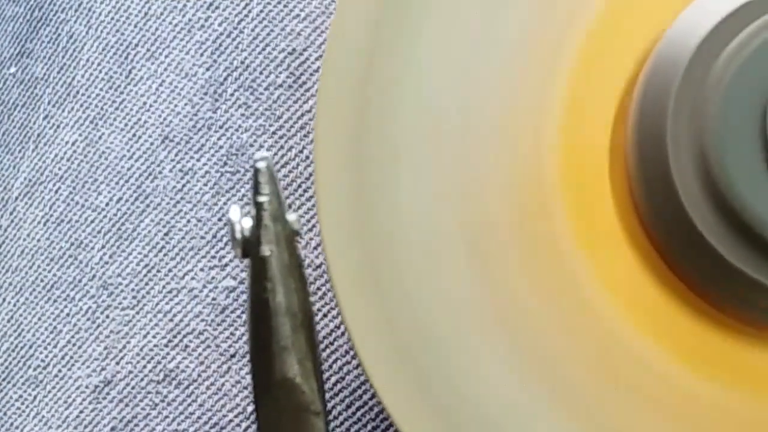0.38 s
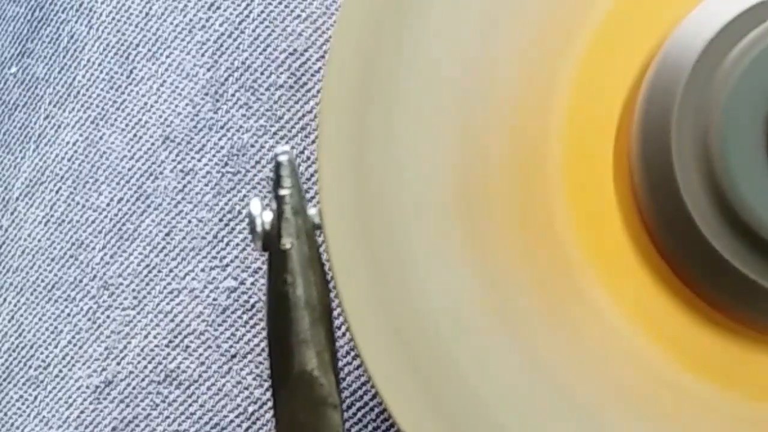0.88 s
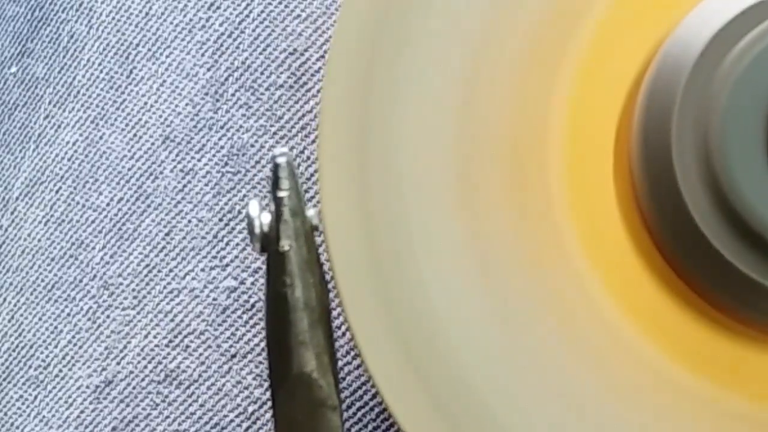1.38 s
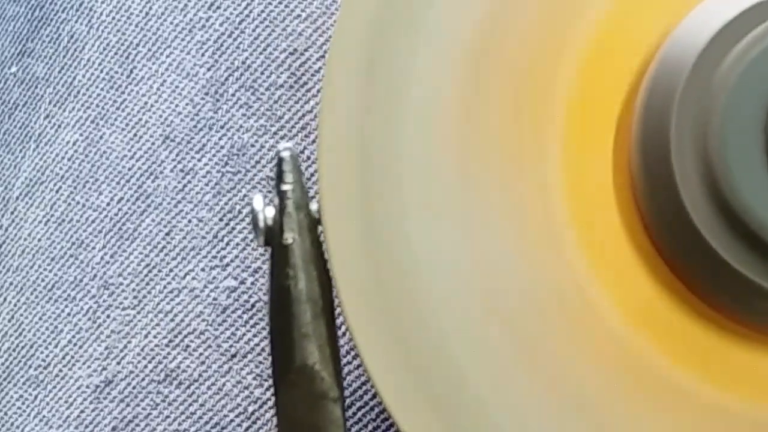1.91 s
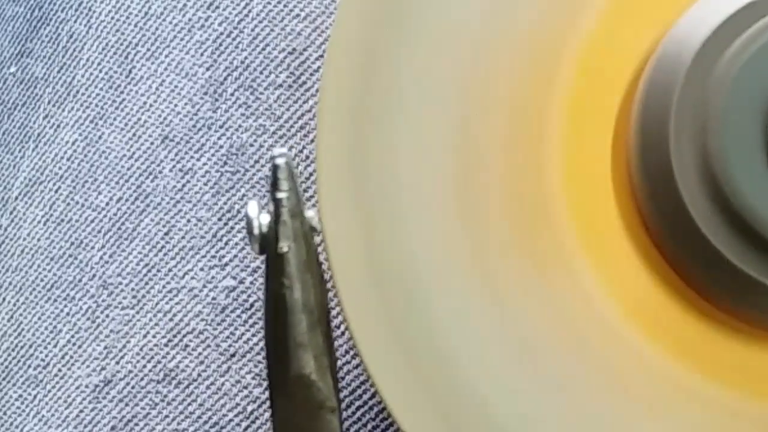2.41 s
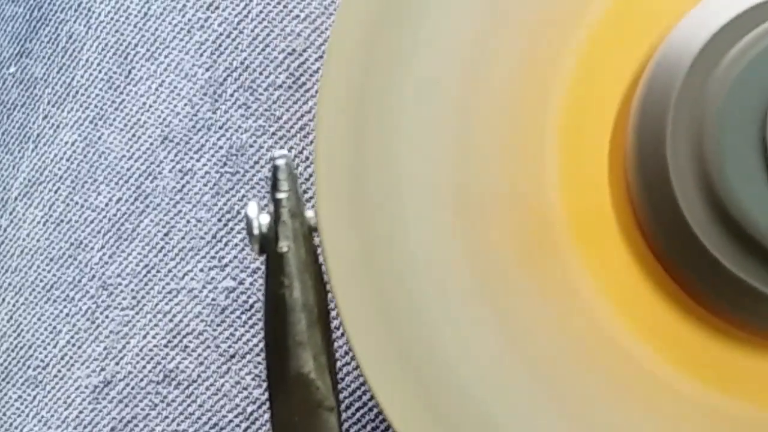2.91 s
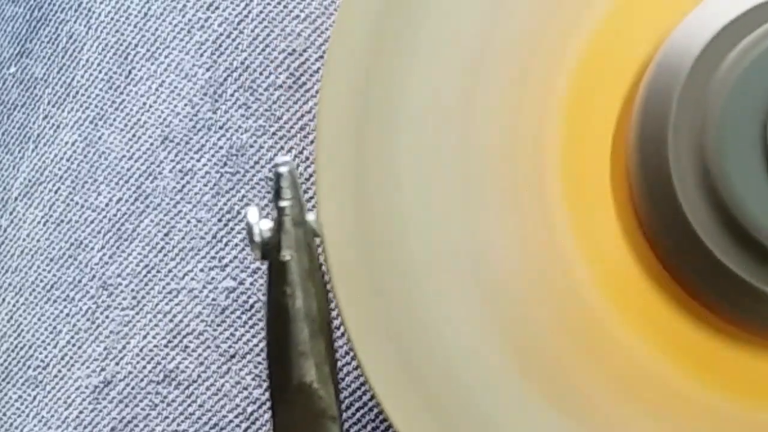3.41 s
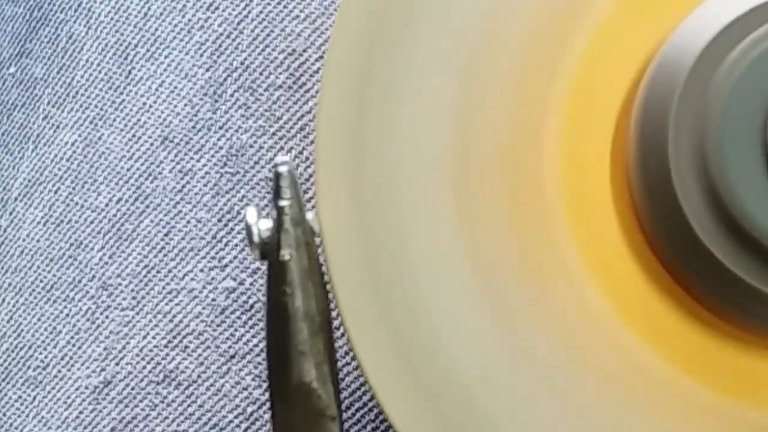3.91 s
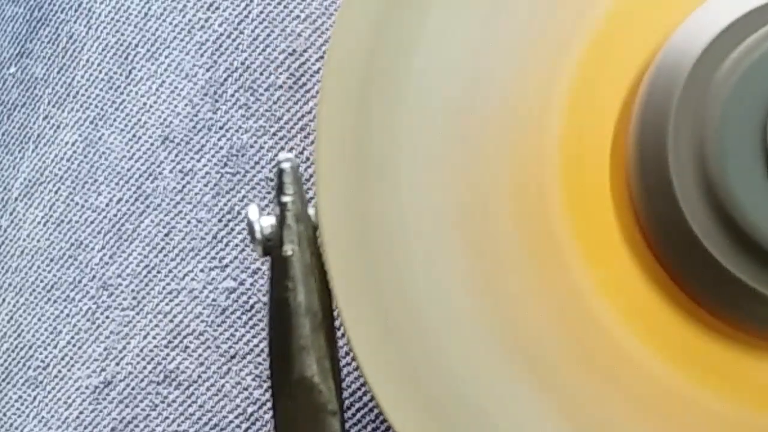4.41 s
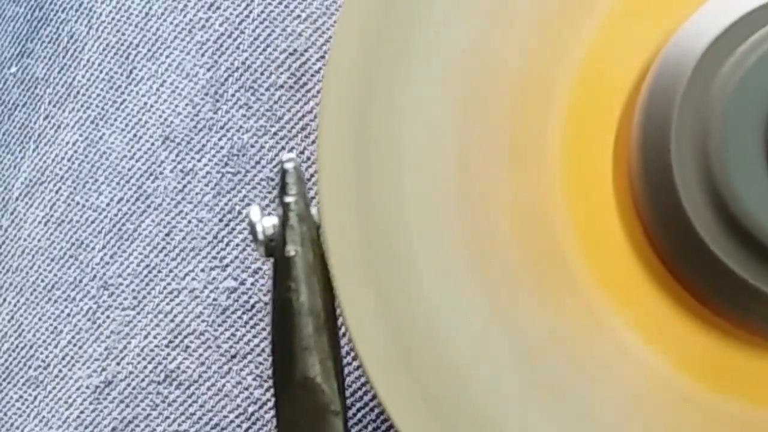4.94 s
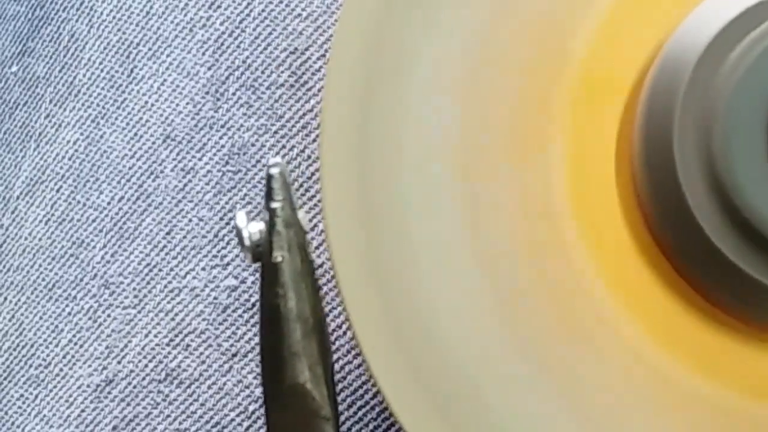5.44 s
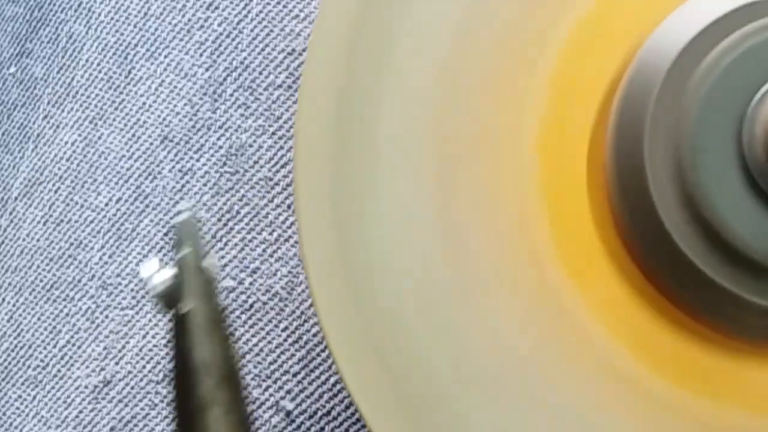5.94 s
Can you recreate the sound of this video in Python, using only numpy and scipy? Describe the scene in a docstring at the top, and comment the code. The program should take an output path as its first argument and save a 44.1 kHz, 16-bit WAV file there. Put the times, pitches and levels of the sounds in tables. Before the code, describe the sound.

Heard close up in a small workshop, a bench grinder coasts with a rough housing rumble, airy whir and small dull ticks from a loose part. At 0.5 s power surges, the whir jumps louder and the loose part buzzes and rattles. From about 0.95 to 1.4 s a steel screw gripped in pliers meets the rim: rapid, irregular metallic bites, ringing briefly, with fine gritty sizzle. From 1.4 to 2.15 s mostly whir and loose ticks remain. Chatter returns at 2.17 s, and a second surge comes just after 2.5 s. Dense bright bites and scraping continue, their repetition slowing as the wheel loses speed, with a short gap around 4.25-4.5 s and sparser, weaker contacts afterward. A final gritty, sharper scrape comes around 5.1 s. After 5.2 s the wheel coasts quieter and slower, with a few faint ticks until 6 s. Short room reflections follow the hits.

```python
"""A bench grinder coasts in a workshop, its housing rumbling while a loose part ticks on the wheel guard.
At 0.5 s a burst of power spins the wheel up; from 0.95 s a small steel screw, held in pliers, is pressed on.
High spots of the rim bite once a turn, each ringing pliers and screw; fine grit scrapes between the bites.
A second burst comes at 2.5 s, with bites until 5.2 s; then the wheel coasts on, slower and quieter.
Noise is shaped by spectra and resonances; bites and ticks are short pushes that ring resonant bodies."""
import sys
import numpy as np
from scipy import signal
from scipy.fft import rfft, irfft, next_fast_len
from scipy.io import wavfile
from scipy.ndimage import uniform_filter1d, minimum_filter1d, map_coordinates

SR = 44100
rng = np.random.default_rng(int(sys.argv[2]) if len(sys.argv) > 2 else 0)


def unload_audio(sound):
    """Save the sound as a 16-bit wav file, at the path given as the first command line argument."""
    columns = np.transpose(np.atleast_2d(sound))
    # keep every value between -1 and 1, then stretch to whole-number steps
    steps = np.round(np.clip(columns, -1, 1) * 32767)
    wavfile.write(sys.argv[1], SR, steps.astype(np.int16))


def makeup_ratio(level_db):
    """Linear amplitude ratio for a level in decibels (20 dB per factor of ten)."""
    decades = np.asarray(level_db, float) / 20
    return 10 ** decades


N = 267687

# Wheel speed: two bursts of power, coasting after each. Each row: time in seconds, turn period in ms.
TURN_MS = [(0, 24), (.49, 26.5), (.52, 11.5), (.95, 14), (1.4, 16.6), (2.15, 18.6), (2.53, 22.2),
           (2.56, 11.7), (3.2, 13.3), (3.6, 14.9), (4.2, 17.2), (4.55, 18.8), (5.2, 22.6), (6.07, 28)]
# Shaking of the machine and rush of the wheel through the air.
# Each row: time in seconds, growl level in dB at the usual speed, rush level in dB.
SHAKE_DB = [(0, -52, -44.5), (.49, -54, -47), (.52, -45.5, -38), (.7, -44.5, -41.5), (.93, -44, -41.5),
            (1.2, -48.5, -46), (1.55, -46.5, -40.5), (2.12, -48.5, -41.5), (2.2, -52.5, -47),
            (2.5, -52, -44.5), (2.56, -52, -43.5), (2.66, -46, -43.5), (2.8, -46.5, -45.5),
            (2.97, -46.5, -44.5), (3.3, -50.5, -47.5), (3.9, -53, -49), (4.35, -55, -48.5),
            (4.75, -55.5, -50.5), (4.97, -53.5, -46.5), (5.5, -56, -50), (6.07, -58, -49.5)]
# Spectrum of the grains. Each row: frequency in Hz, relative level in dB.
SIZZLE_SPECTRUM = [(4000, -30), (6000, -5), (9000, 6.5), (12000, -1), (14500, -8.5), (15700, -11)]
# Resonances of the pliers. Each row: frequency in Hz, width in Hz, relative level in dB.
PLIERS_MODES = [(2340, 190, -12), (2873, 400, -3), (3132, 236, 8.5), (3372, 369, 3), (3928, 227, -3),
                (4778, 94, -8)]
# Resonances of the screw. Each row: frequency in Hz, width in Hz, relative level in dB.
SCREW_MODES = [(7100, 300, 2), (8630, 280, 5), (9370, 300, 13), (10500, 460, -5), (11900, 320, -9),
               (13600, 640, -3), (15000, 900, -11)]


def unit(x):
    """Scales to rms 1."""
    return x / np.sqrt(np.mean(x ** 2) + 1e-20)


def along(points, hz):
    """Interpolates (Hz, value) points on a log frequency axis."""
    f, v = np.transpose(points)
    return np.interp(np.log(hz + 1), np.log(f + 1), v)


def curves(rows):
    """One value per sample for each column after the time."""
    s, *cols = np.transpose(rows)
    return [np.interp(np.arange(N) / SR, s, c) for c in cols]


def wobble(knots_per_s):
    """A smooth random curve."""
    knots = rng.standard_normal(int(N * knots_per_s / SR) + 4)
    return map_coordinates(knots, [np.arange(N) * knots_per_s / SR])


def filtered(x, response):
    """Multiplies the spectrum of x by a response of frequency in Hz."""
    m = next_fast_len(N + SR // 2)
    return irfft(rfft(x, m) * response(np.fft.rfftfreq(m, 1 / SR)), m)[..., :N]


def modes(table):
    """Causal response of a set of resonances, with alternating signs."""
    def response(f):
        total = 0
        for k, (hz, width_hz, db) in enumerate(table):
            damping = 1j * f * width_hz
            total = total + (-1) ** k * makeup_ratio(db) * damping / (hz * hz - f * f + damping)
        return total
    return response


def grit(spread_db, knots_per_s):
    """Noise of rms 1 whose strength wanders from grain to grain."""
    return unit(rng.standard_normal(N) * makeup_ratio(spread_db * wobble(knots_per_s)))


def housing():
    """Bearings and wheel shake the housing: uneven noise lifted at panel resonances, over a motor hum."""
    # Housing panel resonances. Each row: frequency in Hz, width in Hz.
    panel_modes = [(552, 59), (629, 12), (806, 19), (980, 51), (1170, 84), (1430, 95), (1535, 17),
                   (1667, 57), (2110, 27), (2268, 34), (2480, 18), (3880, 24), (5100, 280), (6150, 340),
                   (7300, 410), (8370, 60), (8700, 70)]
    # Noise spectra. Each row: frequency in Hz, relative level in dB.
    growl_spectrum = [(15, -77), (25, -52), (57, -35), (128, -20), (173, -15.5), (214, -16.5), (376, -7),
                      (429, -5.5), (559, -8), (753, -11.5), (981, -2.5), (1300, -7), (1690, -33),
                      (2860, -120)]
    rush_spectrum = [(740, -22.5), (1250, -6.5), (1480, -3), (1650, -5.5), (2070, 0), (2550, -1),
                     (2850, -14), (3260, 1), (4170, -11), (4500, -14.5), (5850, -24), (9900, -120)]
    hiss_spectrum = [(2350, -33.5), (4000, -2.5), (4580, -5), (5200, -5.5), (6630, -12), (7220, -12),
                     (9020, -16.5), (10600, -29.5), (15600, -44)]
    usual_turn_ms, usual_growl_db = 12.2, -49
    hum_hz, hum_db = 61.6, -84

    growl_db, rush_db = curves(SHAKE_DB)
    hiss_db = -53 + 0.89 * (growl_db - usual_growl_db)
    speed_db = 20 * np.log10(usual_turn_ms / curves(TURN_MS)[0])
    growl_db = growl_db + 0.38 * speed_db
    hiss_db = hiss_db + 0.63 * speed_db

    def panels(f):
        return 1 + 0.67 * sum(1 / (1 + (2 * (f - hz) / width_hz) ** 2) for hz, width_hz in panel_modes)

    def shaken(spectrum, push):
        return unit(filtered(push, lambda f: makeup_ratio(along(spectrum, f)) * panels(f)))

    growl = makeup_ratio(growl_db) * shaken(growl_spectrum, grit(0.89, 120))
    rush = makeup_ratio(rush_db) * shaken(rush_spectrum, grit(1.9, 200))
    hiss = makeup_ratio(hiss_db) * shaken(hiss_spectrum, grit(1.3, 200))
    # a narrow noise band, so the hum wavers
    hum = unit(filtered(rng.standard_normal(N), lambda f: 1 / (1 + ((f - hum_hz) / 7) ** 4)))
    top_hiss = unit(filtered(rng.standard_normal(N), lambda f: 1 / (1 + ((f - 15300) / 450) ** 2)))
    return growl + rush + hiss + makeup_ratio(hum_db) * hum + makeup_ratio(hiss_db - 26.0) * top_hiss


def scrape():
    """Between strong bites the screw skips lightly on the rim, and grains of the wheel sizzle across it."""
    # How hard the screw is pressed on. Each row: time in seconds, press in dB (sizzle rms 6 dB above it).
    press = [(0.0, -86), (0.47, -97), (0.57, -69.5), (0.94, -73), (0.98, -62), (1.5, -73), (2.08, -77),
             (2.25, -63.5), (2.32, -68), (2.65, -70), (2.79, -63), (2.96, -78), (3.13, -60.5), (3.36, -68),
             (3.52, -67.5), (3.62, -65), (3.63, -69), (4.07, -63.5), (4.46, -86.5), (4.51, -70.5),
             (4.68, -63), (4.78, -71), (4.92, -70), (4.99, -89), (5.0, -74), (5.14, -56.5), (5.22, -64.5),
             (5.29, -90), (6.04, -100), (6.07, -88)]
    firm_press_db, firm_ring_db, ring_db_per_db = -66, -43, 1.2
    skips_per_turn = 2  # nominal

    press_db, = curves(press)
    ring_db = firm_ring_db + ring_db_per_db * (press_db - firm_press_db)
    skips_per_ms = skips_per_turn / curves(TURN_MS)[0] * makeup_ratio(.4 * wobble(9))
    skip_count = np.cumsum(skips_per_ms) * (1000 / SR)
    skips = unit((0.1 + np.exp(-3.5 * (skip_count % 1))) * makeup_ratio(2.8 * wobble(90)))
    ring = unit(filtered(skips * rng.standard_normal(N), modes(PLIERS_MODES)))

    def grains(f):
        return makeup_ratio(along(SIZZLE_SPECTRUM, f)) + 0.45 * abs(modes(SCREW_MODES)(f))

    sizzle = unit(filtered(skips * grit(1.1, 700), grains))
    return makeup_ratio(ring_db) * ring + makeup_ratio(press_db + 6.0) * sizzle


def blows(s, db, contact_s, body, drag):
    """A sharp touch, then grains dragging during contact; each blow rings the body to its peak level."""
    t = np.arange(1024) / SR
    touching = t < np.reshape(contact_s, (-1, 1))
    push = drag * rng.standard_normal((len(s), len(t))) * touching * np.clip(t / 0.0011, 0, 1)
    push[:, 0] += 1
    ring = irfft(rfft(push) * body(np.fft.rfftfreq(len(t), 1 / SR)), len(t))
    ring *= (makeup_ratio(db) / abs(ring).max(axis=1))[:, None]
    where = np.round(s * SR).astype(int)[:, None] + np.arange(len(t))
    return np.bincount(where.ravel(), ring.ravel(), N + SR)[:N]


def rattle():
    """Something loose ticks against the wheel guard; the contact is soft, so the top is dull."""
    # Loudest ticks. Each row: time in seconds, level in dB (peak 0.6 dB above it).
    loud_ticks = [(.0605, -34), (0.1148, -33), (0.1938, -31.5), (.2067, -35), (.38, -35), (.4117, -34),
                  (0.4276, -36), (.4559, -37), (.489, -35), (0.504, -30), (0.511, -27), (0.565, -25),
                  (0.5803, -24), (.5969, -27), (0.614, -26), (0.6547, -26), (.6896, -33), (.8443, -34),
                  (.8799, -28), (1.4176, -30), (1.664, -25.5), (1.691, -30), (1.7285, -25.5),
                  (1.8254, -27.5), (1.854, -28), (1.8945, -33), (1.9556, -28.5), (4.335, -36),
                  (4.3644, -34), (4.3853, -33), (4.483, -33), (5.2955, -38), (5.3918, -38), (5.4675, -36),
                  (5.5037, -39), (5.5705, -29.5), (5.599, -38), (5.6596, -33), (5.9393, -38)]
    # Ring of the loose part. Each row: frequency in Hz, width in Hz, relative level in dB.
    guard_modes = [(2180, 810, -12), (3220, 150, -2.5), (3280, 340, 10), (4140, 660, -13), (6500, 470, -17),
                   (7600, 520, -8.5)]
    # The motor pulls and the loose part buzzes. Each row: start in seconds, length in seconds, mean level in dB.
    pulls = [(0.502, .17, -32.5), (2.535, 0.09, -33)]
    faint_count, faint_over_growl_db, faint_spread_db = 130, 14, 2
    buzz_per_s = 170

    faint_s = rng.random(faint_count) * (N - 1) / SR
    growl_db = np.interp(faint_s, *np.transpose(SHAKE_DB)[:2])
    faint_db = growl_db + faint_over_growl_db + faint_spread_db * rng.standard_normal(faint_count)
    buzz = [(t, db) for s, length, db in pulls for t in np.arange(s, s + length, 1 / buzz_per_s)]
    buzz = np.transpose(buzz)
    # scatter: 1.5 ms in time, 3 dB in level
    buzz = buzz + [[.0015], [3]] * rng.standard_normal((buzz.shape[1], 2)).T
    s, db = np.hstack([np.transpose(loud_ticks), [faint_s, faint_db], buzz])

    def dull(f):
        return modes(guard_modes)(f) / (1 + 1j * f / 8000) ** 4

    return blows(s, db + .6, .0018, dull, drag=.2)


def shop(x):
    """The walls answer with a diffuse tail; each frequency dies at its own speed."""
    # Decay of the room. Each row: frequency in Hz, t60 in seconds.
    decay = [(300, 0.16), (3000, 0.28), (12000, 0.29)]
    hz, t, z = signal.stft(rng.standard_normal(SR // 3), SR, nperseg=256)
    fade = makeup_ratio(-60 * t / along(decay, hz)[:, None])
    tail = signal.istft(z * fade, SR, nperseg=256)[1]
    delayed = np.pad(x, (200, 0))  # samples
    return signal.fftconvolve(delayed, tail / np.linalg.norm(tail))[:N]


def bites():
    """Times and strengths of the bites: one for every turn of the wheel that a high spot lasts."""
    # High spots of the rim. Each row: first bite in seconds, last bite in seconds, nominal level in dB,
    # nominal ring in ms, nominal brightness in dB.
    spots = [(0.9543, .9545, -24, 1.6, 0), (0.967, 1.041, -19.5, 2.5, 2.5), (0.9748, 1.0358, -26, 3.1, 1),
             (1.0306, 1.061, -24, 2.8, -2), (1.065, 1.065, -24, 3.7, -2), (1.0702, 1.1927, -21, 2.75, -5),
             (1.077, 1.202, -24, 2.5, -5), (1.2245, 1.2562, -19.5, 2.1, -8), (1.2873, 1.3024, -25.5, 3, -8),
             (1.2294, 1.394, -24.5, 3.7, -2.5), (1.334, 1.3528, -21, 2.4, -7),
             (2.1661, 2.2233, -19.5, 2.4, 0), (2.2414, 2.2786, -21, 5.2, 4), (2.296, 2.296, -25, 3.4, 0),
             (2.3244, 2.366, -25, 1.4, -13), (2.338, 2.4255, -26, 3.4, -6), (2.352, 2.4376, -24.5, 3.7, -1),
             (2.4496, 2.5345, -25, 2.7, -2), (2.4813, 2.5214, -26, 2.5, -4),
             (2.5923, 2.6025, -21.5, 2.6, 6), (2.6183, 2.6348, -26, 2.2, 1), (2.684, 2.7084, -25, 2, 7.5),
             (2.758, 2.7926, -22, 3.2, 11), (2.7771, 2.8509, -25, 2.8, 5), (2.8073, 2.8565, -22.5, 2.4, 4),
             (2.8969, 2.9143, -24.5, 2.5, 4), (2.948, 2.9873, -29.5, 3.3, -1),
             (3.0134, 3.0269, -26.5, 2.3, -2), (3.0322, 3.0969, -23, 2.8, -5), (3.051, 3.1166, -26, 2, 3),
             (3.1223, 3.1235, -24, 2.7, 1), (3.1315, 3.2124, -18.5, 5.1, 2), (3.225, 3.278, -24.5, 2.4, -5),
             (3.2602, 3.2857, -24.5, 2.25, 0), (3.3067, 3.3894, -26.5, 0.93, -14),
             (3.341, 3.342, -23.5, 3.7, -7), (3.412, 3.4846, -25.5, 3.2, 2.5), (3.4324, 3.4757, -27, 2, 4),
             (3.4365, 3.4367, -25, 2.4, 0), (3.5, 3.5735, -23, 2.5, 8), (3.588, 3.6183, -19, 3, 5),
             (3.64, 3.641, -21.5, 4.7, -3), (3.7154, 3.7763, -25.5, 2, -1), (3.768, 3.8136, -27.5, 2.3, 3),
             (3.7926, 3.9023, -23.5, 2.7, -5.5), (3.829, 3.9395, -23, 1.9, 0),
             (3.9133, 3.9781, -26, 1.8, 1), (3.9564, 4.055, -28, 1.4, -1), (3.9669, 4.034, -27, 1.9, 0),
             (4.011, 4.0766, -25, 1.6, 1), (4.0936, 4.1115, -22, 2.8, 1), (4.1477, 4.198, -26, 2.2, 4),
             (4.1898, 4.2244, -26, 2.5, 5), (4.5143, 4.552, -25, 4.7, 5), (4.521, 4.6144, -23, 2.1, 0),
             (4.5708, 4.668, -24.5, 2.1, 6), (4.633, 4.6917, -30, 1.8, 8), (4.6615, 4.7804, -30, 1.9, 5),
             (4.835, 4.876, -30.5, 2.3, 1), (4.915, 4.957, -30, 1.8, -1), (5.0018, 5.0657, -26.5, 2, 8),
             (5.053, 5.1385, -22, 2.8, 1), (5.087, 5.132, -21, 1.45, -6), (5.147, 5.2155, -26.5, 3.6, 1.5),
             (5.1568, 5.199, -27.5, 5.1, 4)]
    swell_db = 1.5  # how much weaker a spot starts and ends
    slip_s, level_spread_db, ring_spread, bright_spread_db = .0003, 1.3, .15, 3

    clock = np.arange(N) / SR
    turns = np.cumsum(1 / curves(TURN_MS)[0]) * (1000 / SR)
    rows = []
    for first, last, db, *rest in spots:
        a, b = np.interp([first, last], clock, turns)
        times = np.interp(np.linspace(a, b, round(b - a) + 1), turns, clock)
        edge = np.linspace(-1, 1, len(times)) ** 2
        rows += [(s, db - swell_db * e, *rest) for s, e in zip(times, edge)]
    s, db, ring_ms, bright_db = np.transpose(rows)
    chance = rng.standard_normal((len(s), 4)).T
    s = s + slip_s * chance[0]
    db = db + level_spread_db * chance[1]
    ring_ms = ring_ms * np.exp(ring_spread * chance[2])
    return s, db, ring_ms, bright_db + bright_spread_db * chance[3]


def chatter():
    """Each bite rings the pliers; its torn grains ring the screw and spit a crackle."""
    s, db, ring_ms, bright_db = bites()
    contact_s = np.clip(ring_ms - 1.4, 0, 8) / 1000  # the steel rings on a little after the touch ends

    def torn(f):
        lag = np.exp(-1j * f * 0.0012)  # crackle lags slightly
        return modes(SCREW_MODES)(f) + 0.59 * makeup_ratio(along(SIZZLE_SPECTRUM, f)) * lag

    pliers = blows(s, db + .6, contact_s, modes(PLIERS_MODES), drag=.2)
    screw = blows(s, db + bright_db - 22.5, contact_s + .0006, torn, drag=0.6)
    return pliers + screw


def scene():
    """Machine and contact, close to one microphone, with the room's answer to the hits."""
    machine = housing() + scrape()
    hits = rattle() + chatter()
    return (machine + hits + makeup_ratio(-10.5) * shop(hits))[None]


def roll_off(x):
    """The treble ends steeply here."""
    return signal.sosfilt(signal.butter(12, 21300, fs=SR, output="sos"), x)


def record(dry):
    """Gain control turns loud passages down, then a band-pass keeps only its band."""
    knee_db, squeeze_db_per_db = -36.5, 0.44
    hold = round(0.029 * SR)  # centred window: look-ahead and hold
    low_hz, top_hz = 42, 15720
    power = uniform_filter1d(dry ** 2, size=SR // 200)
    crest = -minimum_filter1d(-abs(power), size=hold)
    over_knee = abs(uniform_filter1d(crest, size=hold)) / makeup_ratio(knee_db) ** 2
    steadied = dry * (1 + over_knee ** 2) ** (-squeeze_db_per_db / 4)
    mix = filtered(steadied, lambda f: (f > low_hz) * (f < top_hz))
    return roll_off(mix)


dry = scene()
out = record(dry)
unload_audio(out)
```